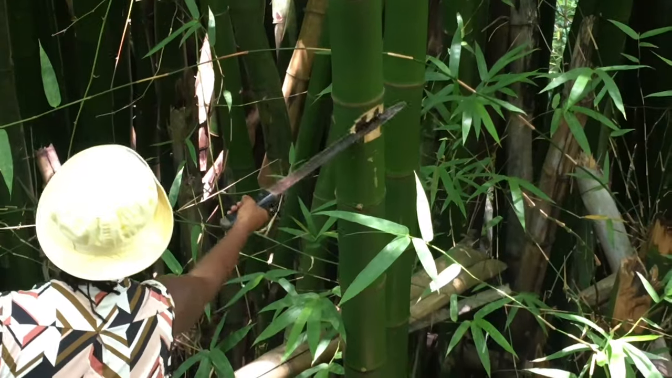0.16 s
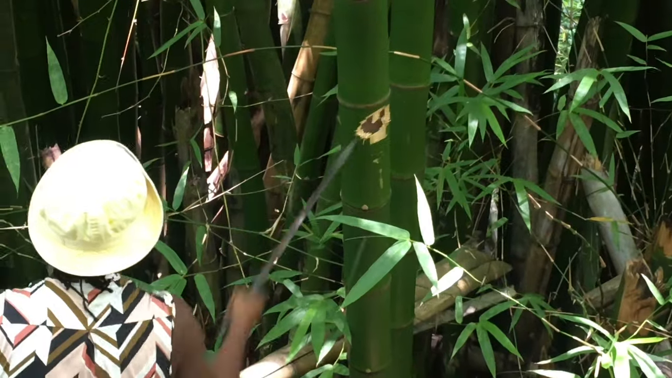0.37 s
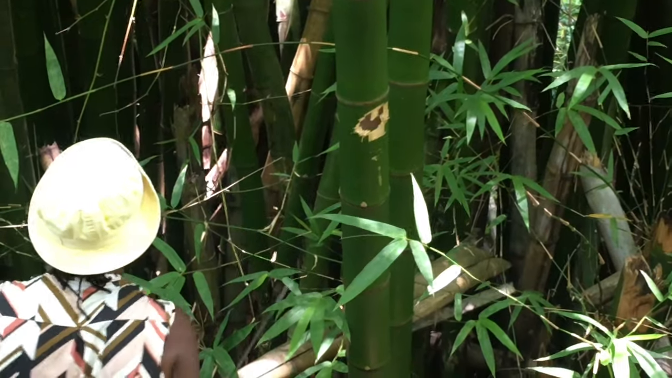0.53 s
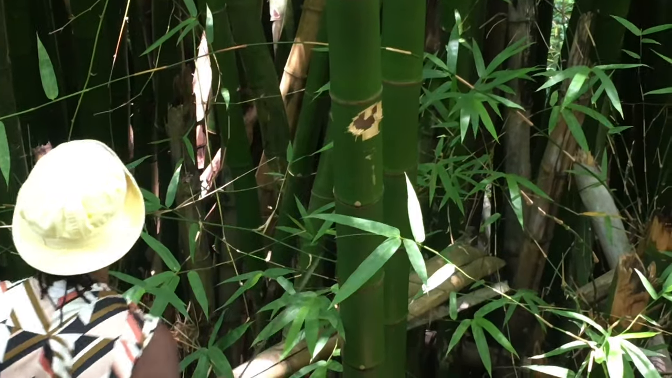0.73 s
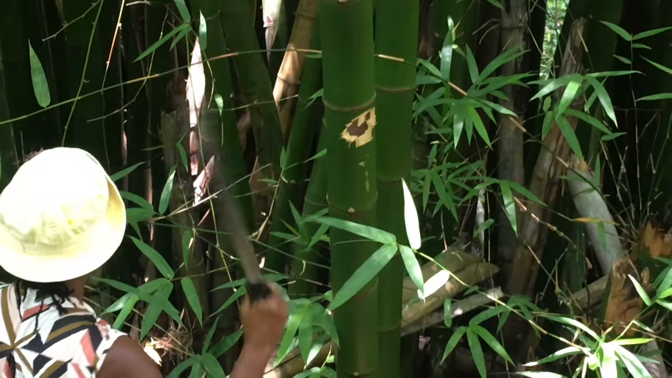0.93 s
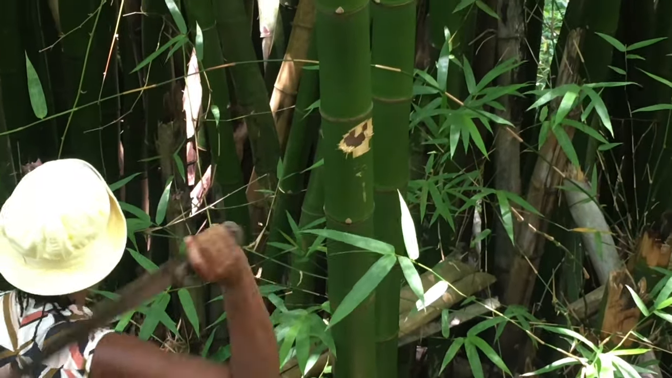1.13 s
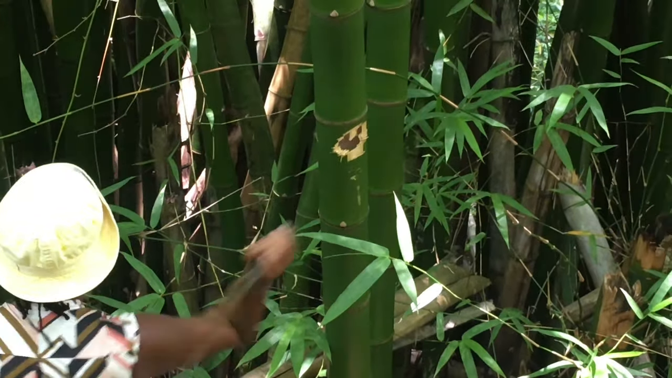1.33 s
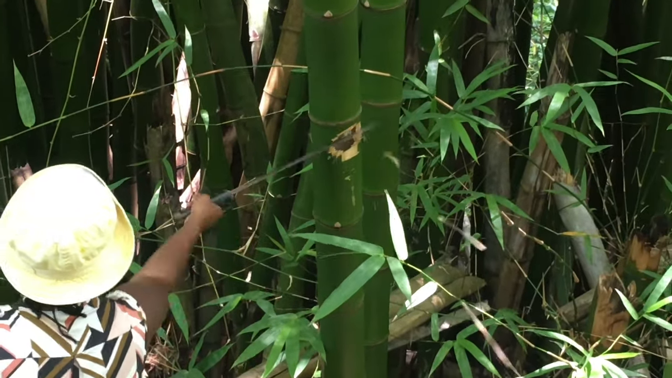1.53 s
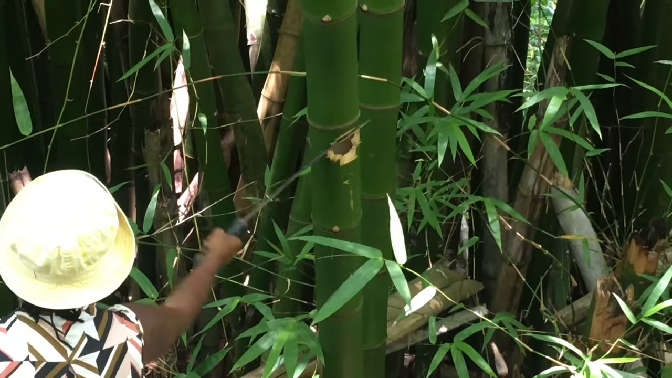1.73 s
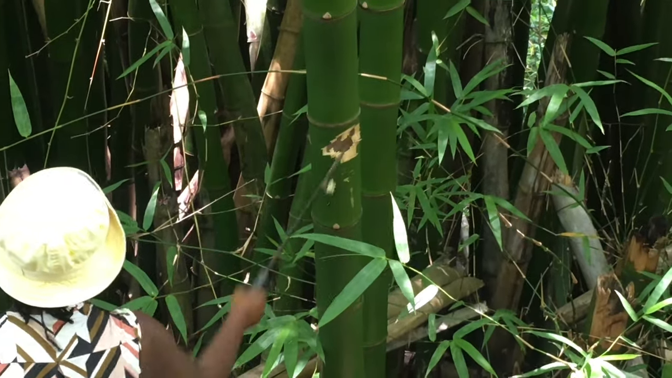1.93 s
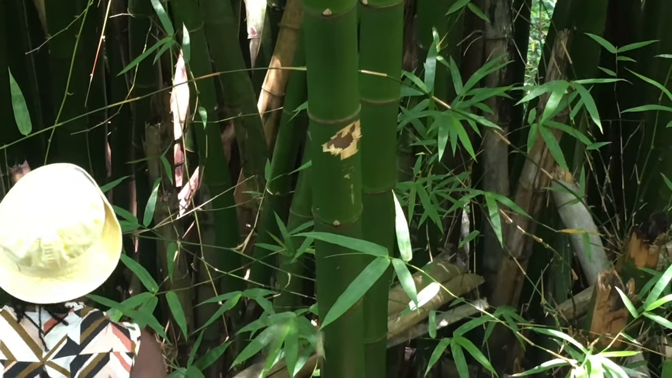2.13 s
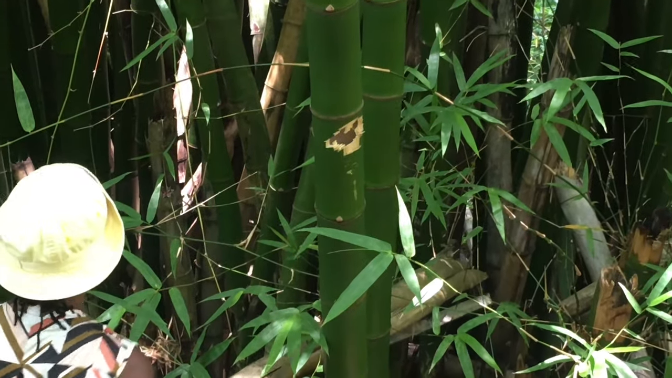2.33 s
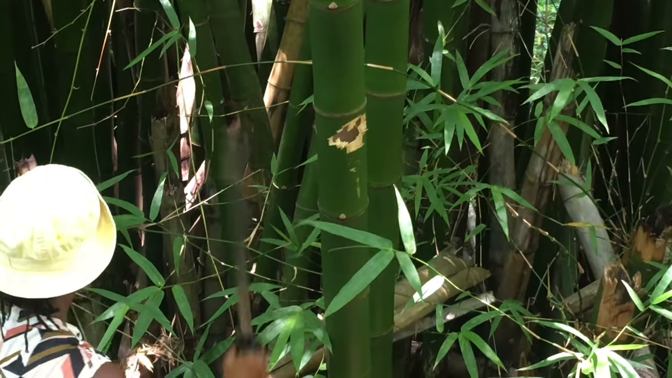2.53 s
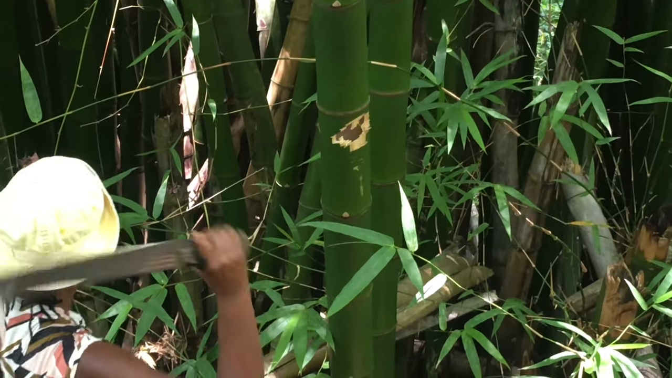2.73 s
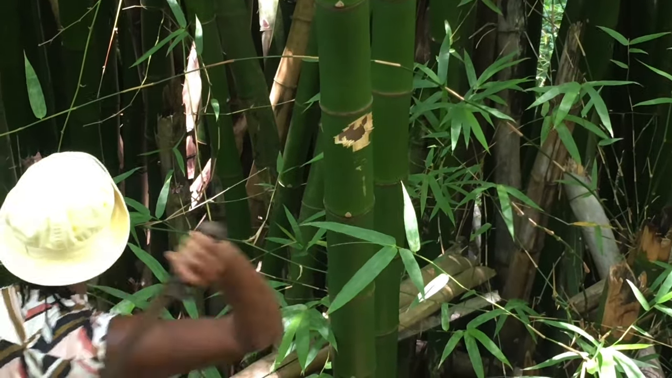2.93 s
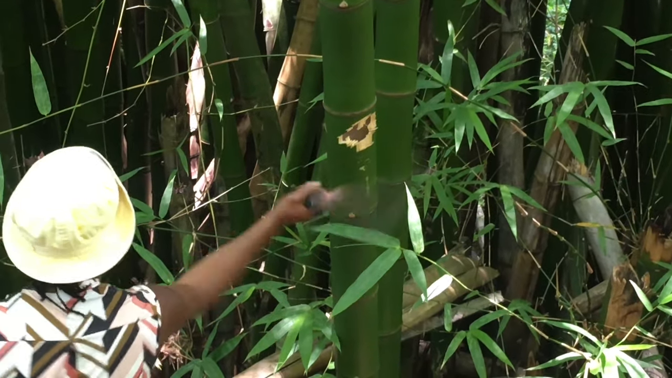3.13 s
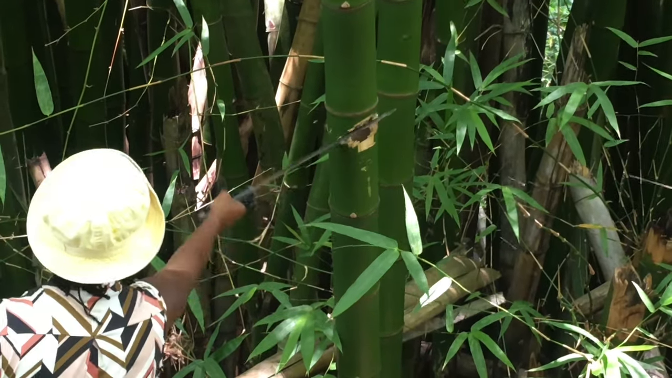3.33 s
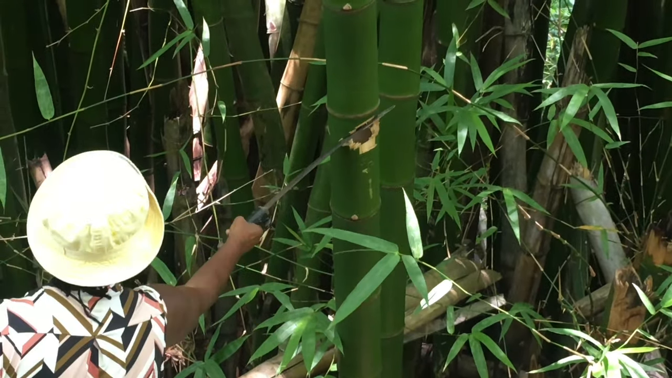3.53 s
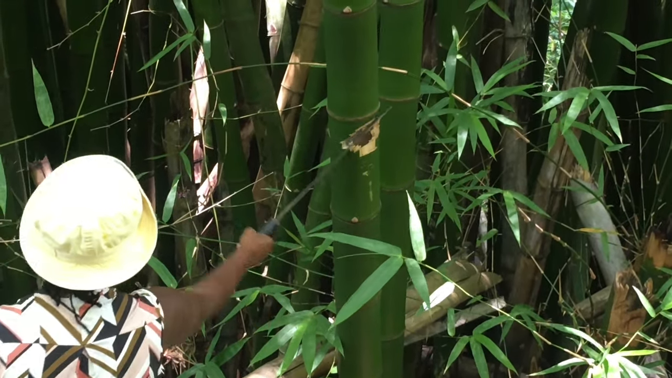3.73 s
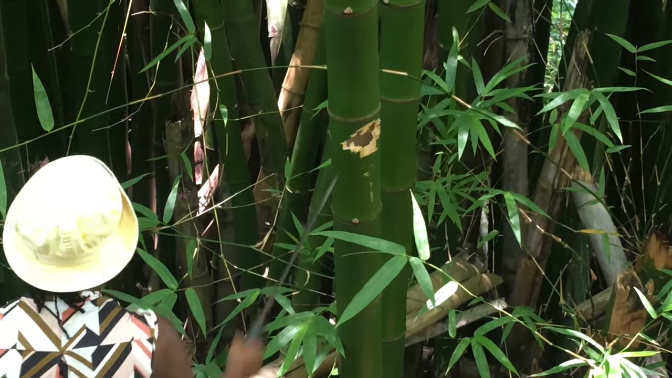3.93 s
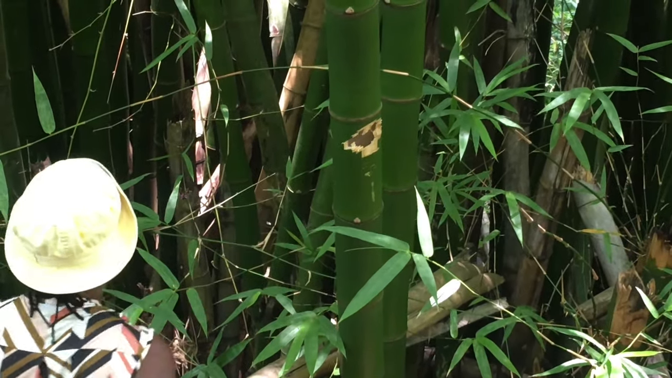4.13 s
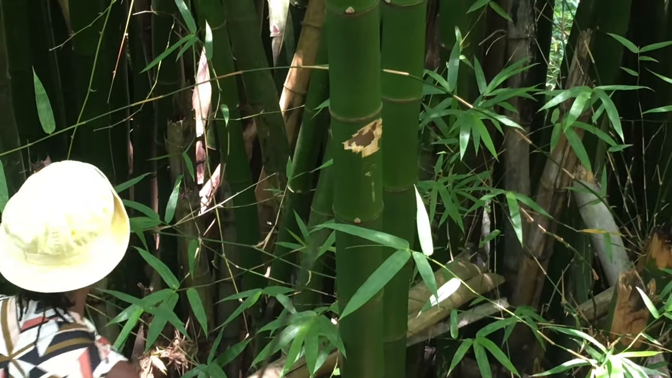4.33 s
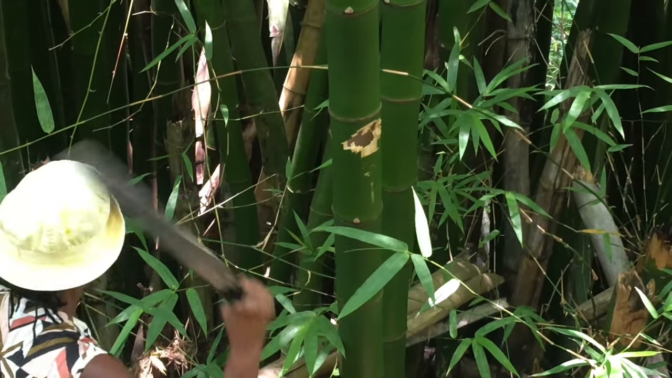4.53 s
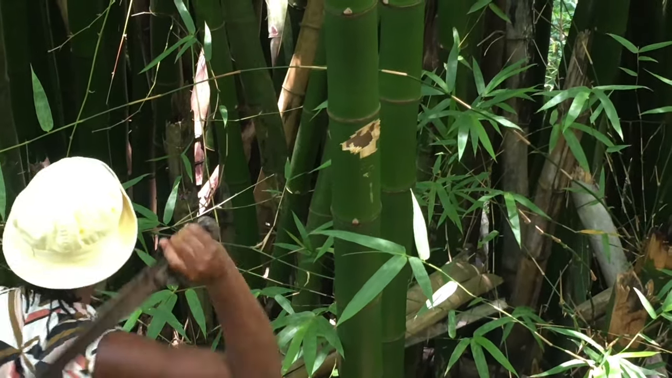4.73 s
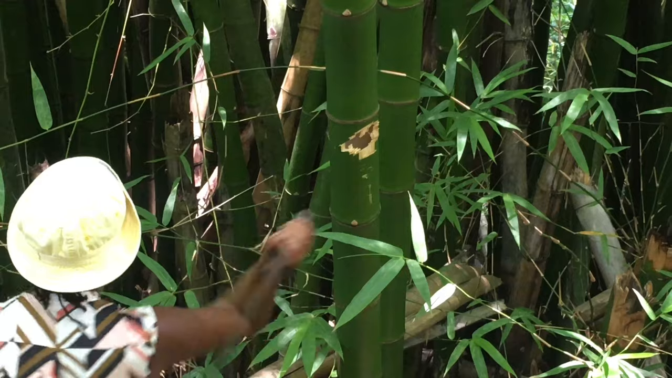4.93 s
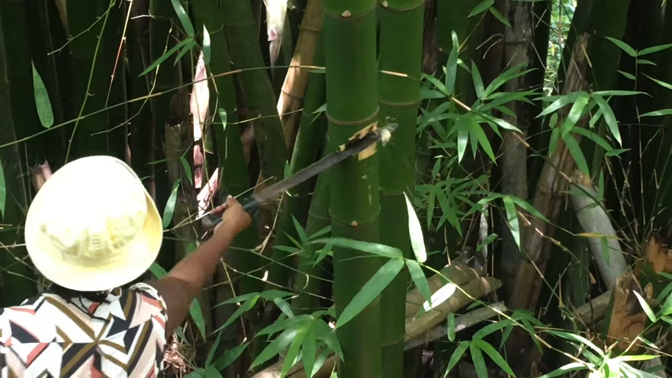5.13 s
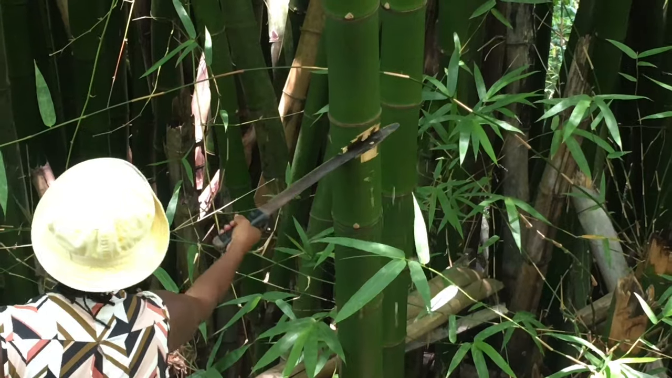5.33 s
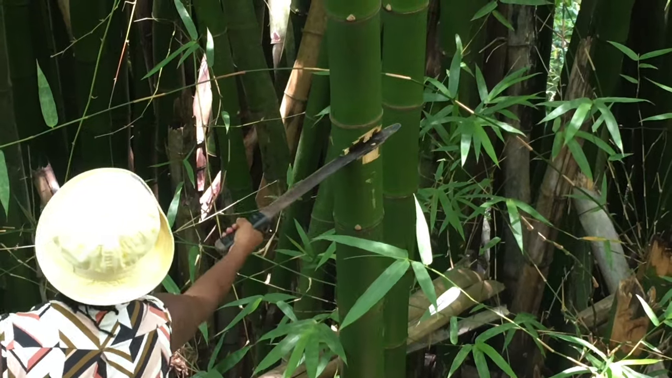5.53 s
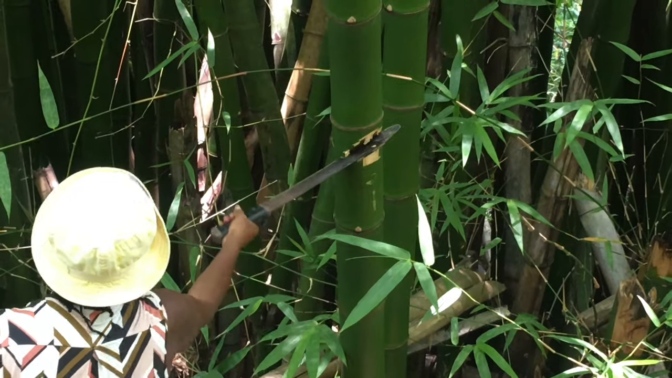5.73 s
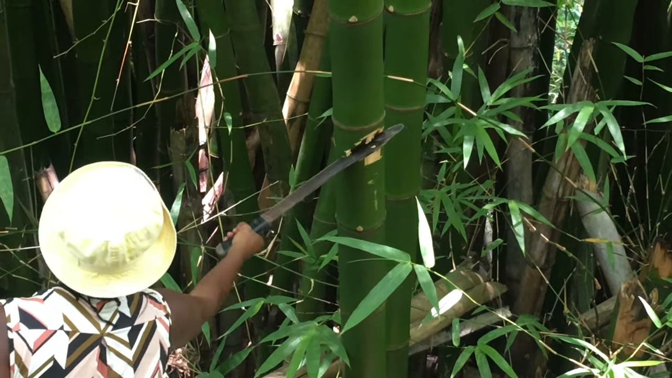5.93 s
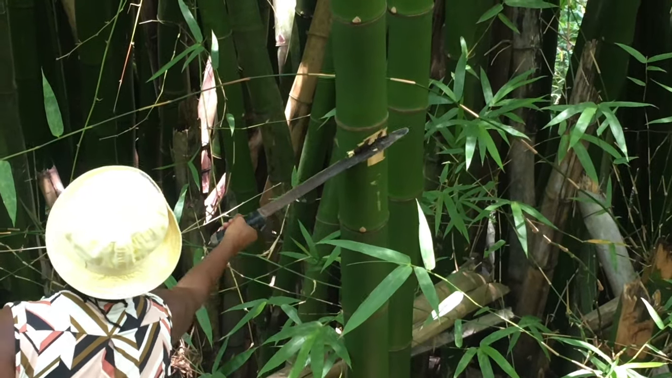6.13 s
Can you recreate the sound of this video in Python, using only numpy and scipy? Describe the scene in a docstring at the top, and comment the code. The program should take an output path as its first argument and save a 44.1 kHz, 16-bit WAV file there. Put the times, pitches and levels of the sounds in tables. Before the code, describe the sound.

A machete bites a thick hollow stalk three times, nearly two seconds apart, the later two louder. Each blow is abrupt, mid-pitched and woody, with a brief tearing crack and a diffuse outdoor tail. Soft scrapes, dry fibre snaps and a tiny squeak mark the blade being freed. Deep, lumpy wind thumps the close microphone, over light leaf ticks, faint insect hiss and a thin fly whine.

```python
"""A faint breeze and insect hiss come first, then small rubs and a creak of a blade in a bamboo stalk.
Three machete chops follow: the hollow stalk rings in decaying tones, fibres crack as bursts of noise,
and the grove scatters each blow into a short hiss. After each cut the blade is worked loose in rough slips.
Gusts of low noise buffet the microphone; leaves, twigs and an insect tick in brief noise bursts,
and insects hiss and whine faintly."""
import sys
import numpy as np
from scipy import signal
from scipy.fft import rfft, irfft
from scipy.io import wavfile
from scipy.ndimage import uniform_filter1d

SR = 44100
rng = np.random.default_rng(int(sys.argv[2]) if len(sys.argv) > 2 else 0)


def master(y):
    """Save y as 16-bit WAV."""
    cut = np.clip(np.atleast_2d(y).T, -1, 1)
    pcm = np.round(cut * 32767)  # scale
    wavfile.write(sys.argv[1], SR, pcm.astype(np.int16))


def voltage_ratio(decibels):
    """Convert decibels (scalar or array-like) to amplitude ratios, 20 dB per decade."""
    exponent = np.asarray(decibels, float) / 20
    return 10 ** exponent


N = 272587  # samples, about 6.2 s


def evened(x):
    """Scales a sound to rms 1."""
    return x / np.sqrt(np.mean(x ** 2) + 1e-20)


def read(points, hz):
    """Reads a table of (Hz, value) along a log-frequency axis."""
    f, value = np.transpose(points)
    return np.interp(np.log(hz + 1), np.log(f + 1), value)


def add(mix, s, sound):
    """Mixes a sound in at s seconds, cut off at the end of the mix."""
    part = mix[round(s * SR):][:len(sound)]
    part += sound[:len(part)]


def noise(colour, size=N):
    """Random noise of rms 1, shaped to a spectrum of (Hz, dB)."""
    hz = np.fft.rfftfreq(size, 1 / SR)
    spectrum = rfft(rng.standard_normal(size)) * voltage_ratio(read(colour, hz))
    return evened(irfft(spectrum, size))


def hump(hz, width, floor_db=-40):
    """The spectrum of one broad resonance."""
    return [(max(hz - 2 * width, 20), floor_db), (hz - width / 2, -3), (hz, 0),
            (hz + width / 2, -3), (hz + 2 * width, floor_db)]


def lumps(per_s):
    """A slow random wander of rms 1, with little change faster than per_s times a second."""
    return noise([(per_s, 0), (2 * per_s, -30), (SR / 2, -90)])


# Colour of the quiet air. Each row: frequency in Hz, level in dB.
AIR_COLOUR = [(120, -33), (200, -12.5), (350, -15), (430, -13), (560, -15), (735, -14), (1350, -17),
              (2050, -19.5), (3300, -23), (5000, -24), (16000, -30)]


def air():
    """The soft hush of the grove: steady noise whose level wanders slightly."""
    level_db = -64 + 0.32 * lumps(2.76)
    return voltage_ratio(level_db) * noise(AIR_COLOUR)


# Distant insect hiss, silent after the last row. Each row: time in seconds, level in dB.
INSECT_HISS = [(.1, -82), (.45, -68), (1.0, -66.5), (1.46, -68)]
# A small fly's whine. Each row: time in seconds, pitch in Hz, level in dB, both before wavering.
FLY_WHINE = [(3.82, 1740, -84), (3.87, 1722, -67.5), (4.3, 1706, -71), (4.45, 1750, -82),
             (4.6, 1686, -67.5), (5.051, 1590, -70.5)]
# Insect notes. Each row: start in seconds, level in dB, centre of the buzz in Hz,
# centre of the whistle in Hz, basic time to fall 60 dB in seconds.
INSECT_NOTES = [(3.859, -68, 8750, 8630, 0.42), (4.345, -56.5, 8770, 8590, 0.79)]


def insects():
    """A band of distant hiss, one wavering sine whine, and high notes made of narrow noise."""
    t = np.arange(N) / SR
    hiss = noise([(4700, -27), (5300, -5.5), (7400, -7.5), (8000, -22)])
    out = voltage_ratio(np.interp(t, *np.transpose(INSECT_HISS), right=-120)) * hiss
    s, hz, db = np.transpose(FLY_WHINE)
    turns = np.cumsum(np.interp(t, s, hz) + 35 * lumps(120.)) / SR
    whine_db = np.interp(t, s, db, left=-120, right=-120) + 1.8 * lumps(20.0)
    out += voltage_ratio(whine_db) * np.sin(2 * np.pi * turns)
    u = np.arange(SR // 2) / SR
    for s, db, buzz_hz, whistle_hz, t60 in INSECT_NOTES:
        # the buzz dies sooner than the basic time, the whistle later
        buzz = noise(hump(buzz_hz, 700.), size=len(u)) * voltage_ratio(-60 * u / (0.65 * t60))
        whistle = .6 * noise(hump(whistle_hz, 45.), size=len(u)) * voltage_ratio(-60 * u / (1.15 * t60))
        add(out, s, voltage_ratio(db) * (buzz + whistle) * np.minimum(u / 0.03, 1))
    return out


# The breeze between gusts. Each row: time in seconds, level in dB.
BREEZE_LEVEL = [(0, -74), (.9, -72), (1.22, -50), (1.8, -53), (2.0, -66), (2.7, -74), (3.3, -58),
                (3.9, -57), (4.4, -50), (5.0, -48), (5.6, -52), (5.83, -44), (6.0, -68)]
# Gusts. Each row: peak time in seconds, peak level in dB, time to fall 20 dB in seconds.
GUST_PEAKS = [(.06, -63, .09), (.519, -60, .1), (1.003, -57, .12), (1.319, -28, .07), (1.391, -32, .045),
              (1.546, -40.5, .16), (1.85, -42, .1), (1.916, -27, .056), (2.055, -33.5, .08),
              (2.195, -36, .12), (2.405, -46.5, .2), (2.463, -45, .09), (2.554, -41, .083),
              (2.715, -41, .2), (2.749, -42.5, .17), (2.941, -35.5, .1), (3.167, -31, .2),
              (3.266, -30.5, .045), (3.392, -35, .15), (3.456, -28, .04), (3.527, -33, .1),
              (3.572, -27, .105), (3.761, -39, .075), (3.841, -35.5, .115), (3.957, -32, .13),
              (4.077, -28, .17), (4.265, -30, .1), (4.365, -30, .085), (4.469, -23.5, .13),
              (4.6, -26.5, .08), (4.684, -31.5, .09), (4.77, -26, .12), (4.899, -32, .15),
              (5.049, -31, .17), (5.233, -28.5, .2), (5.313, -29.5, .1), (5.365, -33, .08),
              (5.477, -34, .15), (5.54, -38, .1), (5.65, -38, .12), (5.727, -36.5, .2), (5.901, -30, .055),
              (6.071, -38.5, .072)]


def gusts_db():
    """Wind strength in dB: each gust climbs at one rate and dies at its own, over the breeze."""
    rise_db_per_s = 350.
    t = np.arange(0, N, 64) / SR
    s, db, fall = np.transpose(GUST_PEAKS)[..., None]
    shape_db = db - np.where(t < s, rise_db_per_s * (s - t), 20 * (t - s) / fall)
    breeze_db = np.interp(t, *np.transpose(BREEZE_LEVEL))
    power = voltage_ratio(2 * shape_db).sum(0) + voltage_ratio(2 * breeze_db)
    return np.interp(np.arange(N) / SR, t, 10 * np.log10(power))


# Colour of the deep wind rumble. Each row: frequency in Hz, level in dB.
RUMBLE_COLOUR = [(10, -46.5), (25, -13), (45, -5), (72, 0), (110, -5), (160, -18), (250, -48), (400, -85.5)]
# Colour of the higher wind flutter. Each row: frequency in Hz, level in dB.
FLUTTER_COLOUR = [(70, -27.5), (130, 1.5), (220, -8), (320, -19), (450, -27), (700, -56.5)]
# Sharp eddies pop on the microphone. Each row: start in seconds, peak level in dB.
WIND_POPS = [(1.296, -26), (3.248, -20), (3.455, -14.5), (3.559, -18.5), (3.822, -34.5), (3.928, -35),
             (4.081, -21), (4.145, -29.5), (4.184, -32.5), (4.253, -22), (4.326, -28.5), (4.444, -24),
             (4.578, -18.5), (4.602, -20), (4.76, -18), (4.885, -25), (4.957, -31), (5.707, -32.5),
             (5.885, -26.5)]


def wind():
    """Low lumpy pressure; the flutter grows faster than the rumble as gusts strengthen."""
    level_db = gusts_db()
    swirl = noise(RUMBLE_COLOUR)
    swirl /= (uniform_filter1d(swirl ** 2, size=1800) + 0.085) ** 0.2  # steadied, so the gusts set the level
    out = voltage_ratio(level_db) * evened(swirl)
    flutter = evened(noise(FLUTTER_COLOUR) * voltage_ratio(5.2 * lumps(22.)))
    out += voltage_ratio(1.46 * level_db + 3.5) * flutter
    # a pop has a sharp edge and a low ring
    u = np.arange(-.006, .02, 1 / SR)
    edge = np.exp(-np.where(u < 0, (u / 0.0014) ** 2, u / 0.0055))
    pop = np.cos(2 * np.pi * 125 * u) * edge * np.hanning(2 * len(u))[len(u):]
    for s, db in WIND_POPS:
        add(out, s, voltage_ratio(db) * pop)
    return out


def tick(db, colour, t60):
    """A short burst of coloured noise, scaled to its peak level."""
    t = np.arange(2048) / SR
    burst = noise(colour, size=2048) * np.minimum(t / 0.00028, 1) * voltage_ratio(-60 * t / t60)
    return voltage_ratio(db) * burst / abs(burst).max()


# Small dry ticks: leaves and twigs, and near 2500 Hz after 4.2 s an insect's slowing ticks.
# Each row: start in seconds, peak level in dB, centre in Hz.
SMALL_TICKS = [(0.1375, -51, 3130), (0.3478, -41, 2850), (0.5345, -49, 2450), (0.5876, -48, 5660),
               (0.602, -49, 3130), (0.7183, -33.5, 2900), (0.78, -48.5, 5400), (1.1174, -48, 3440),
               (1.866, -46, 3460), (1.9395, -48, 4030), (2.302, -49, 3250), (3.0111, -49.5, 3280),
               (3.6324, -50, 3250), (4.1132, -49.5, 3490), (4.2533, -51, 2320), (4.33, -50, 2500),
               (4.8574, -52, 2520), (4.4667, -49, 3450), (4.49, -49.5, 2500), (4.724, -50.5, 2650),
               (4.9133, -51, 3200), (5.7727, -49, 3240)]


def small_ticks(mix):
    """Small dry ticks are brief noise bursts: the listed ones and 20 faint ones at random times."""
    when, size, pitch = rng.random((20, 3)).T
    faint_db = -58 + 3 * (2 * size - 1)
    faint = zip(when * N / SR, faint_db, np.interp(pitch, (0, 1), (2300, 3400)))
    for s, db, hz in SMALL_TICKS + list(faint):
        width_hz = 480.0 * voltage_ratio(0.49 * (db + 52))  # louder ticks are broader
        add(mix, s, tick(db, hump(hz, width_hz, -24), 0.021))


# Dry fibres snap in the treble. Each row: start in seconds, peak level in dB.
FIBRE_SNAPS = [(0.2892, -50), (0.3406, -40.5), (0.3985, -47), (0.7018, -48), (0.7417, -46), (0.9233, -47),
               (1.7659, -39), (1.7794, -37), (1.7957, -35), (1.801, -38), (1.8642, -44), (2.4533, -48.5),
               (5.007, -50), (5.865, -49), (5.877, -36), (5.8864, -42), (5.709, -47), (5.8955, -43),
               (6.107, -49.5), (6.1494, -49.5)]


def fibre_snaps(mix):
    """A dry fibre parts suddenly, giving a very short bright burst."""
    colour = [(5000, -1.5), (9000, -7), (11300, 3), (13000, 4), (16000, -11.5)]
    for s, db in FIBRE_SNAPS:
        add(mix, s, tick(db, colour, 0.013))


# The blade squeaks as it pulls free. Each row: start in seconds, level in dB before the swell,
# centre in Hz, length in seconds.
BLADE_SQUEAKS = [(3.636, -65, 4150, 0.05), (3.715, -70, 4150, 0.045), (3.75, -65, 4080, 0.02)]


def squeaks(mix):
    """Rubbing makes a narrow band of noise that swells and fades."""
    for s, db, hz, length in BLADE_SQUEAKS:
        size = round(length * SR)
        squeak = np.hanning(size) * noise(hump(hz, 60.), size=4096)[:size]
        add(mix, s, voltage_ratio(db) * squeak)


# The wedged blade creaks in quick slips. Each row: start in seconds, level in dB before the swell,
# slips a second at the start, slips a second at the end, length in seconds.
BLADE_CREAKS = [(.201, -49, 318, 345, .05)]
# Colour of the creak. Each row: frequency in Hz, level in dB.
CREAK_COLOUR = [(320, -7), (980, 2), (1640, -6), (2600, -10)]


def creaks(mix):
    """Nearly even slips give a stack of partials, loudest early; the high ones fade fastest."""
    for s, db, start_hz, end_hz, length in BLADE_CREAKS:
        u = np.arange(0, 1, 1 / (length * SR))  # progress through the creak
        hz = start_hz + (end_hz - start_hz) * u
        turns = np.cumsum(hz * (1 + .04 * rng.standard_normal(len(u)))) / SR
        stack = np.zeros(len(u))
        for k in range(1, 9):
            partial_db = read(CREAK_COLOUR, k * hz) - 6.0 * k * u
            stack += voltage_ratio(partial_db) * np.sin(2 * np.pi * k * turns + k ** 2)
        add(mix, s, voltage_ratio(db) * np.sin(np.pi * u ** .7) * evened(stack))


# Tones of the stalk; each cut lands at another spot. Each row: frequency in Hz,
# time to fall 60 dB in seconds, then the level in dB at cut one, cut two and cut three.
STALK_TONES = [(254, 0.22, 1, -9, -3), (360, 0.06, -8, -14, 0), (413, 0.026, -25, -6, -6),
               (600, 0.068, -22, -11, -14), (692, 0.088, -8, -2, 1), (768, .08, -3, 1, -1),
               (906, 0.22, -25, -17.5, -12.5), (1025, .055, -4, -3, 6), (1129, 0.06, 6, -1.5, -1.5),
               (1187, 0.076, -3, -6, -8), (1310, .08, -7, -6, -6), (1550, .1, -12, -22, -17),
               (1670, 0.05, -8, -14.5, -4.5), (1736, 0.088, -0.5, -13.5, -10), (2190, 0.095, -13, -24, -6),
               (2322, 0.095, -16, -30, -8), (3470, .08, -18, -24, -15)]


def stalk(force, cut):
    """The hollow stalk rings under a force at one of the cuts; peak 1."""
    t = np.arange(SR // 3) / SR
    ring = np.zeros(len(t))
    for hz, t60, *cuts_db in STALK_TONES:
        # the tube is not round, so each tone has a weaker, lower twin
        pair = np.sin(2 * np.pi * hz * t) + 0.3 * np.sin(2 * np.pi * hz * .955 * t)
        ring += voltage_ratio(cuts_db[cut] - 60 * t / t60) * pair
    sound = signal.fftconvolve(force, ring)
    return sound / abs(sound).max()


# Colour of steel scraping on fibre. Each row: frequency in Hz, level in dB.
SCRAPE_COLOUR = [(300, -27), (700, 0.5), (1300, -0.5), (3200, -4), (6500, -9), (11000, -12), (16000, -15)]


def wrench(knock_db, length, cut, hiss_db):
    """Stick and slip: soft uneven slips knock the stalk, with a gritty hiss of steel on fibre that lingers."""
    t = np.arange(round(4 * length * SR) + 5000) / SR
    grain_db = 3.5 * np.repeat(rng.standard_normal(len(t) // 96 + 1), 96)[:len(t)]
    rise = np.minimum(t / 0.0013, 1)
    stroke = voltage_ratio(grain_db) * rise * np.exp(-(t / length) ** 2)
    slips = uniform_filter1d(stroke * rng.standard_normal(len(t)), size=14)
    out = voltage_ratio(knock_db) * stalk(slips, cut)
    linger = 0.33 * rise * voltage_ratio(-60 * t / 0.7) * np.cos(np.pi / 2 * t / t[-1])
    hiss = (np.minimum(stroke, 3.) + linger) * noise(SCRAPE_COLOUR, size=len(t))
    add(out, 0, voltage_ratio(hiss_db) * hiss)
    return out


# The blade worked in the cut rubs the stalk. Each row: start in seconds, knock peak in dB,
# time for the stroke to fade to about a third in seconds, scrape hiss in dB before its fade.
BLADE_RUBS = [(0.203, -47, 0.029, -61), (0.288, -55, 0.012, -65), (.327, -47, 0.012, -72),
              (0.3462, -37, 0.001, -51), (1.762, -41, 0.038, -48), (1.793, -39.5, 0.029, -51.5),
              (1.844, -37.5, 0.027, -55.5), (1.864, -50, 0.018, -50), (1.94, -50.5, 0.029, -58),
              (1.971, -49.5, 0.012, -57), (3.648, -57, 0.059, -61), (3.671, -37.5, 0.037, -71),
              (3.761, -58, 0.045, -62), (5.552, -50.5, .02, -67), (5.605, -52, 0.019, -65.5),
              (5.647, -52, .015, -66), (5.688, -58, 0.04, -55.5), (5.823, -52, 0.017, -64),
              (5.865, -49, 0.0069, -57), (5.877, -50, 0.037, -58)]


def wrenches(mix):
    """The blade is worked back and forth, ringing the stalk at the latest cut."""
    for s, db, length, hiss_db in BLADE_RUBS:
        cut = sum(s > row[0] for row in CHOP_LIST) - 1  # before the first chop, -1 picks cut three's tones
        add(mix, s, wrench(db, length, cut, hiss_db))


# Colour of the grove's echo. Each row: frequency in Hz, level in dB.
ECHO_COLOUR = [(240, -31.5), (400, -4), (620, -9.5), (850, -7), (1100, -10), (2000, -12.5), (3500, -15.5),
               (6500, -18), (16000, -16.5)]
# How long the grove rings. Each row: frequency in Hz, time to fall 60 dB in seconds.
GROVE_DECAY = [(400, 0.47), (900, 0.99), (2500, 0.78), (8000, 0.81), (16000, 0.42)]


def grove_echo(t):
    """The stalks around scatter a blow into patchy noise that dies at its own rate at each pitch."""
    hz, frame_s, z = signal.stft(noise(ECHO_COLOUR, size=len(t)), SR, nperseg=256, noverlap=192)
    patches = rng.standard_normal(z.T.shape)
    patches = uniform_filter1d(uniform_filter1d(patches, 10, 0), 4, 1)
    patches = evened(patches).T  # uneven stalks
    z = z * voltage_ratio(-60 * frame_s / read(GROVE_DECAY, hz)[:, None] + 2.2 * patches)
    tail = signal.istft(z, SR, nperseg=256, noverlap=192)[1][:len(t)]
    return tail * np.minimum(t / 0.024, 1)


# Colour of the cracking fibres. Each row: frequency in Hz, level in dB.
CRACK_COLOUR = [(250, -10), (420, -6), (1000, 2), (1700, -7), (2500, -11), (4000, -13), (6500, -18),
                (11000, -17.5), (16000, -17)]


def chop(cut, blow_db, crack_db, splinter_db, echo_db):
    """The edge bites with a tearing force and a hard stop; fibres crack, skin shatters, the grove echoes."""
    bite_s, crack_t60_s = 0.0046, 0.038  # the time the blade bites; how fast the main crack dies
    t = np.arange(SR) / SR
    force = 0.1 * rng.standard_normal(len(t)) * np.exp(-t / 0.021) * np.minimum(t / bite_s + 0.46, 1)
    force[round(bite_s * .7 * SR)] += 2.1  # the hard stop
    out = voltage_ratio(blow_db) * stalk(force, cut)[:len(t)]
    # a hollow slap returns 0.1 s after the blow
    slap = noise(hump(860, 150.0), size=len(t)) * np.minimum(t / 0.0069, 1) * voltage_ratio(-60 * t / 0.18)
    add(out, .1, voltage_ratio(blow_db - 37) * slap[:SR // 2])
    rise = np.minimum(t / (0.65 * bite_s) + .3, 1)
    after = np.maximum(t - bite_s, 0)
    fade = voltage_ratio(-60 * after / crack_t60_s) + 0.68 * voltage_ratio(-60 * after / 0.15)  # a quick part and a slow part
    out += noise(CRACK_COLOUR, size=len(t)) * rise * voltage_ratio(crack_db) * fade
    # the hard skin shatters
    splinter = noise([(3000, -30), (9000, -10), (12500, 0), (16000, 0)], size=len(t))
    out += voltage_ratio(splinter_db) * splinter * np.minimum(t / 0.002, 1) ** 2 * voltage_ratio(-60 * after / 0.02)
    return out + voltage_ratio(echo_db) * grove_echo(t)


# The chops. Each row: start in seconds, peak of the stalk's ring in dB, then the levels in dB,
# before their fades, of the crack, the splintering skin and the grove's echo.
CHOP_LIST = [(1.4647, -7.5, -16.5, -40, -31.5), (3.1805, -3, -17.5, -21, -32),
             (5.0662, -2.5, -19, -33, -33)]


def chops(mix):
    """The machete strikes the stalk, each time at a new spot."""
    for cut, (s, *levels_db) in enumerate(CHOP_LIST):
        add(mix, s, chop(cut, *levels_db))


def scene():
    """Everything reaches one microphone."""
    mix = air() + insects() + wind()
    for play in (small_ticks, fibre_snaps, squeaks, creaks, wrenches, chops):
        play(mix)
    return mix[None]


# The microphone housing colours everything. Each row: centre in Hz, width in Hz, boost or cut in dB.
HOUSING_TONES = [(515, 90, -5), (1930, 170, -4.5), (4880, 1300, -5.5), (6120, 167, 2.5), (7660, 660, -4),
                 (10300, 480, -5), (15060, 700, 1)]


def housing(sound):
    """The microphone housing adds dips and peaks, one resonance after another."""
    for hz, width, db in HOUSING_TONES:
        band = signal.lfilter(*signal.iirpeak(hz, hz / width, SR), sound)
        sound = sound + (voltage_ratio(db) - 1) * band
    return sound


def low_pass(x):
    """Removes everything above the highest recorded frequency."""
    return signal.sosfilt(signal.butter(12, 16850, fs=SR, output="sos"), x)


def record(dry):
    """The housing colours the sound; filters then limit the band to 36-16050 Hz."""
    dry = housing(dry)
    dry = signal.sosfilt(signal.butter(4, 36, "highpass", fs=SR, output="sos"), dry)
    dry = signal.sosfilt(signal.cheby2(16, 36, 16050, fs=SR, output="sos"), dry)
    return low_pass(dry)


dry = scene()
out = record(dry)
master(out)
```